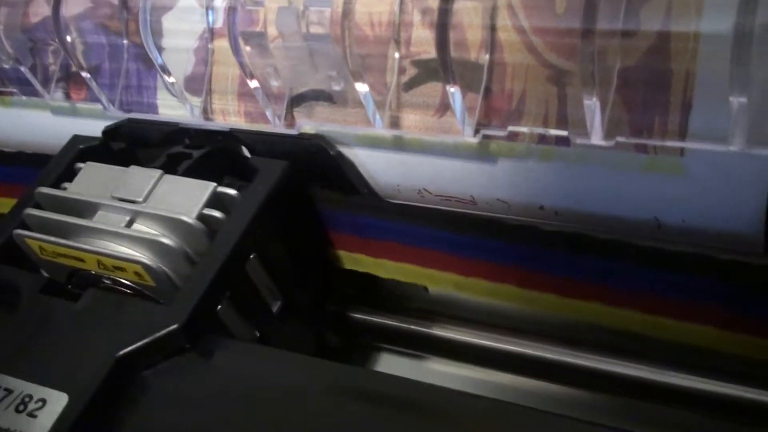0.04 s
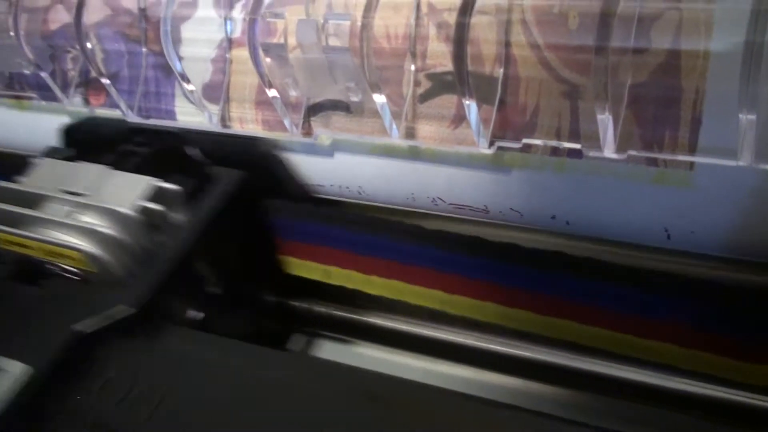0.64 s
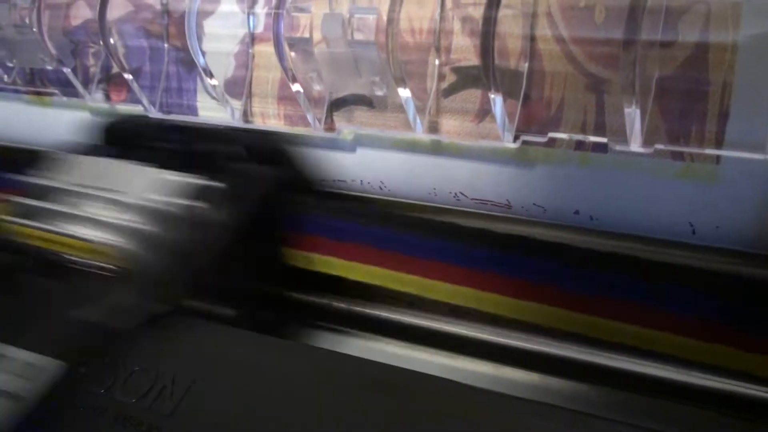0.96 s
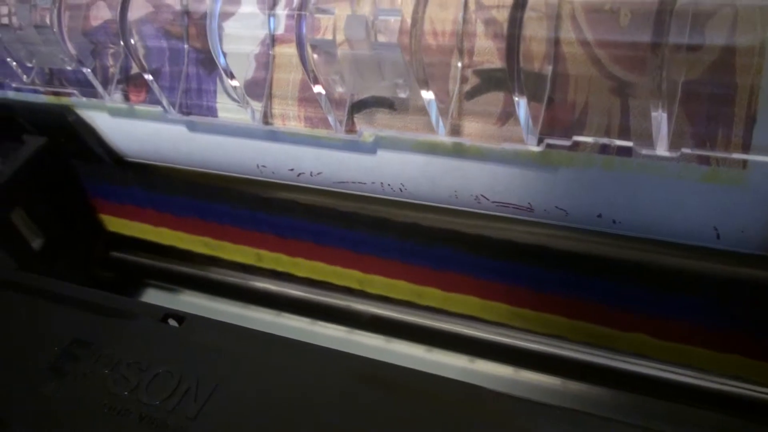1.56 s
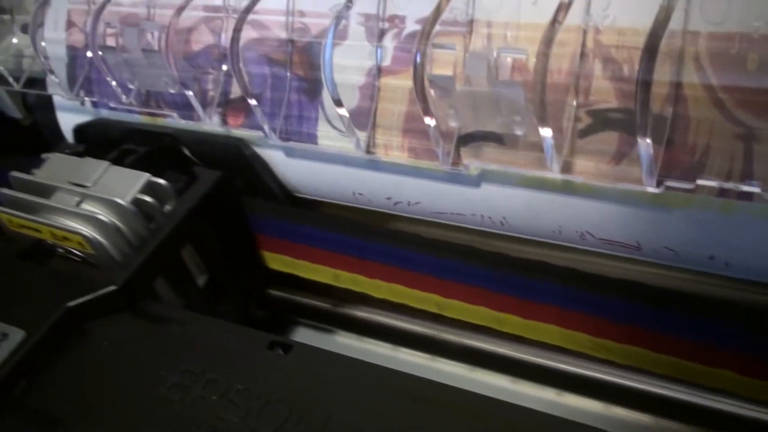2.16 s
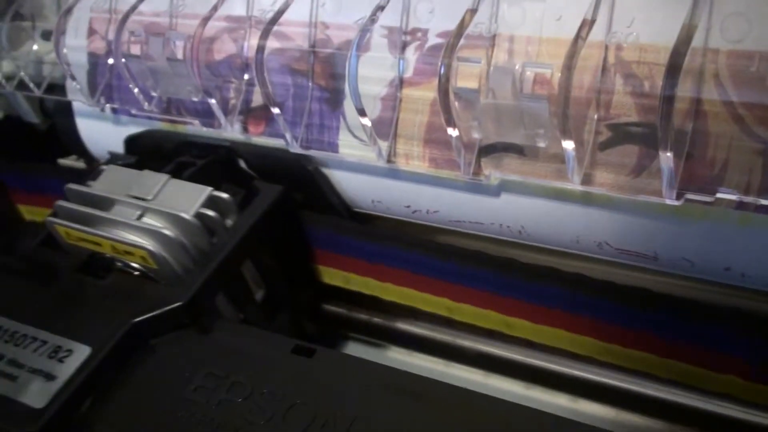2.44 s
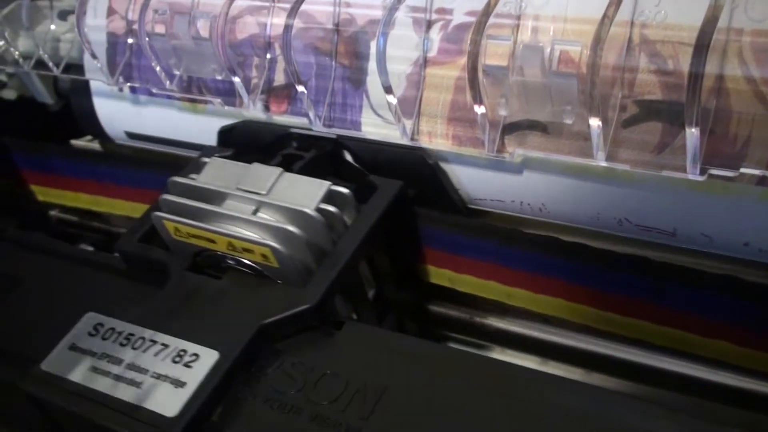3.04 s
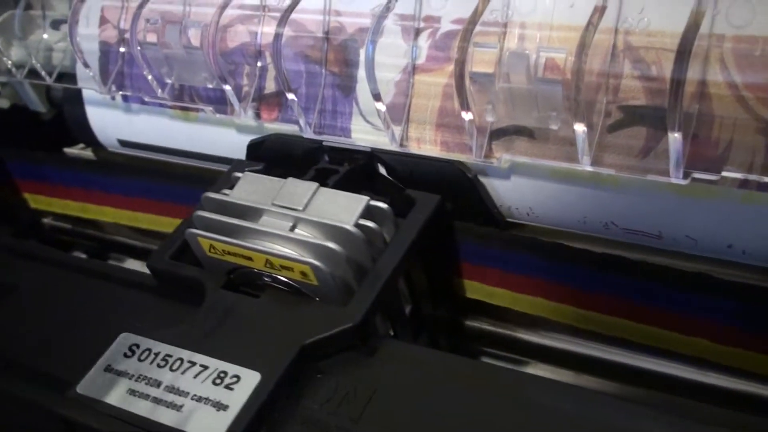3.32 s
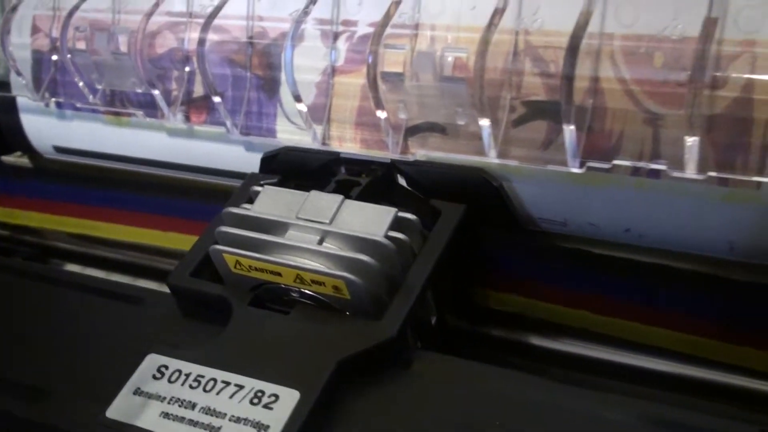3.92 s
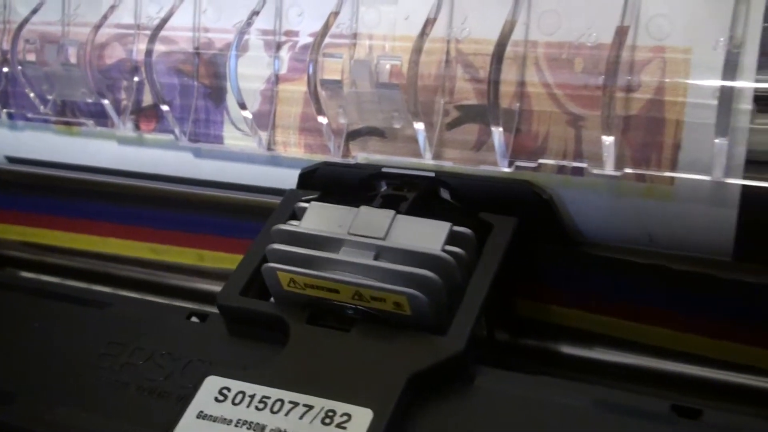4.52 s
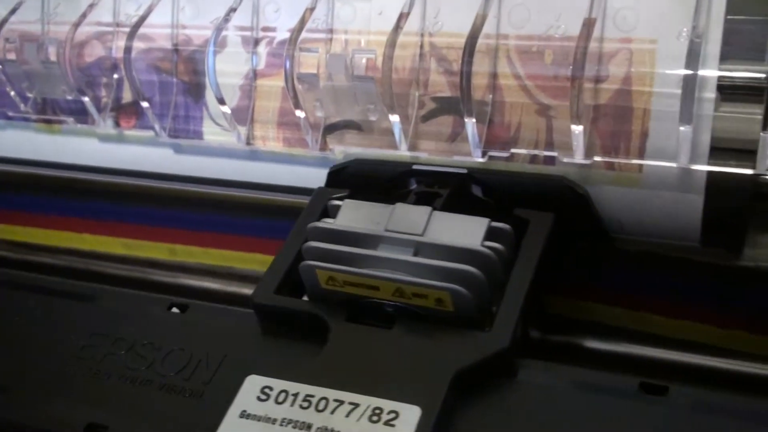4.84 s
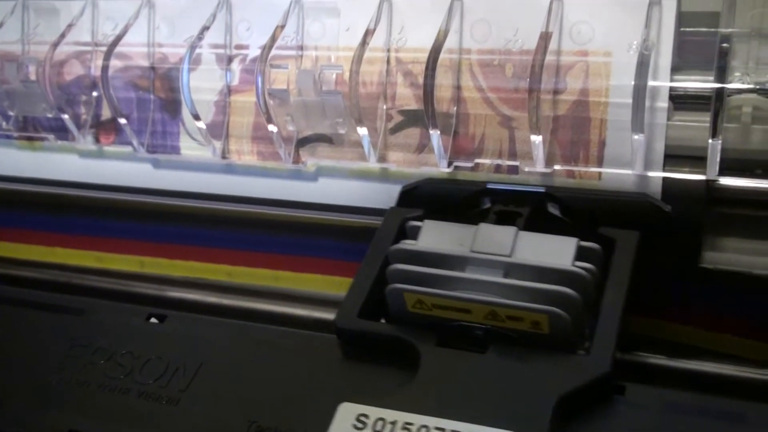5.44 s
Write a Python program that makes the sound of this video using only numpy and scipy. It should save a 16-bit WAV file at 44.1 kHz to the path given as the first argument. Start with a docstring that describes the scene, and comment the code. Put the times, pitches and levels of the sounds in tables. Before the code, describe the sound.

A dot matrix printer works in a quiet room, heard in stereo from just above the carriage. A small steel latch gives a double click at the very start and another at 0.3 seconds. Through the first second and a half, a motor jerks the carriage to and fro in short whirring, whining runs, with irregular gear knocks, plastic clunks, small ticks and a couple of faint scrapes. The strongest knocks fall near 0.6, 0.8 and 1.0 seconds. At about 1.2 seconds the pins fire in one very short, bright rasp. From about 1.6 seconds the head prints continuously: a loud, harsh, rasping buzz of steady pitch with a piercing high whistle on top and a faint motor hum beneath. The whistle swells and dips and the buzz changes colour as the head travels, still going at the end, around 5.5 seconds.

```python
"""A dot matrix printer on a desk in a quiet room, stereo microphone just above the carriage.
First the ribbon shifter's latch clicks and a stepper motor jerks the carriage to and fro: gears knock,
the plastic frame clunks, the ribbon guide scrapes. At 1.2 s the pins fire briefly during a fast run.
From 1.56 s to the end they hammer one slow line, a rasping buzz with a piercing whistle on top,
which changes colour as the head travels through the hollow case."""
import sys
import numpy as np
from scipy import signal
from scipy.fft import rfft, irfft
from scipy.io import wavfile

SR = 44100
rng = np.random.default_rng(int(sys.argv[2]) if len(sys.argv) > 2 else 0)


def transcribe(signal):
    """Save signal, clipped to [-1, 1], as a 16-bit WAV file at the path in sys.argv[1]."""
    frames = np.atleast_2d(signal).T
    limited = np.clip(frames, -1, 1)
    pcm = np.round(limited * 32767).astype(np.int16)
    wavfile.write(sys.argv[1], SR, pcm)


N = 246078
TIME = np.arange(N) / SR


def amp(db):
    """Decibels to gain."""
    return 10 ** (np.asarray(db) / 20)


def unit(x):
    """Scale to rms 1."""
    return x / np.sqrt(np.mean(x ** 2) + 1e-20)


def white():
    """Fresh white noise."""
    return rng.standard_normal(N)


def drift(rate_hz):
    """Smooth random wander, mostly slower than rate_hz; rms about 1."""
    hop, settle = 100, 1000
    pole = np.exp(-2 * np.pi * rate_hz * hop / SR)
    noise = rng.standard_normal(N // hop + settle + 2)
    slow = signal.lfilter([1], [1, -2 * pole, pole * pole], noise)[settle:]
    return np.interp(np.arange(N) / hop, np.arange(len(slow)), unit(slow))


def switch(start, rise=0.0011):
    """Ramp from 0 to 1 at the start time."""
    return np.clip((TIME - start) / rise, 0, 1)


def bell(x, centre, spread):
    """A smooth hump of height 1."""
    return np.exp(-.5 * ((x - centre) / spread) ** 2)


def follow(curve):
    """Gain that follows a curve of (t/s, level/dB)."""
    return amp(np.interp(TIME, *np.transpose(curve)))


def response(points, size=4096):
    """Minimum-phase impulse response of a spectrum of (f/Hz, level/dB)."""
    hz, db = np.transpose(points)
    grid = np.maximum(np.fft.rfftfreq(size, 1 / SR), 1)
    gain = amp(np.interp(np.log(grid), np.log(hz), db))
    cepstrum = irfft(np.log(gain))
    cepstrum[1:size // 2] *= 2
    cepstrum[size // 2 + 1:] = 0
    return irfft(np.exp(rfft(cepstrum)))


def through(x, impulse):
    """Filter that keeps the power of white noise, so only the shape of its spectrum counts."""
    return signal.oaconvolve(x, impulse / np.linalg.norm(impulse))[:N]


def colour(x, points):
    """Give a force a broad spectrum."""
    return through(x, response(points))


def ring(x, modes, size=8192):
    """A force rings a set of damped resonances."""
    t = TIME[:size]
    impulse = sum((-1) ** k * amp(db) * width * np.exp(-np.pi * width * t) * np.cos(2 * np.pi * hz * t)
                  for k, (hz, width, db) in enumerate(modes))
    return through(x, impulse)


def grains(per_s, spread_db):
    """Random small contacts of uneven strength; rms 1."""
    contacts = (rng.random(N) < per_s / SR) * rng.choice([-1, 1], N)
    return unit(contacts * amp(spread_db * np.clip(white(), -2, 2)))


def blow(start, decay_s, rise=0.0016, hold=0):
    """Envelope of a contact: it rises, holds and dies away."""
    return switch(start, rise) * np.exp(-np.maximum(TIME - start - rise - hold, 0) / decay_s)


def hammering(rate_hz, sharpness):
    """Noise that flares at each pin strike."""
    return unit(white() * np.exp(-sharpness * (TIME * rate_hz % 1)))


def with_octave(phase, octave_db):
    """A sine and its second harmonic."""
    return np.sin(phase) + amp(octave_db) * np.sin(2 * phase)


# Room tone, far behind the printer: f/Hz, level/dB
ROOM_SPECTRUM = [(20, -25), (60, -29), (78, -0.5), (91, 17.5), (115, -2), (250, -5), (1000, 1.5),
                 (16000, -35)]
def room_tone(level_db=-57.5):
    """Faint steady noise with a low hum near 90 Hz."""
    return amp(level_db) * colour(white(), ROOM_SPECTRUM)


# Stereo side signal at the microphone: f/Hz, level/dB
SIDE_SPECTRUM = [(100, -18.5), (1000, -8.5), (5000, -16), (8000, -13.5), (15000, -4.5)]
def reflections(x, echo_db=-8.5, t60=0.11, size=16384):
    """Direct sound plus quick reflections from case and desk, partly different left and right."""
    t = TIME[:size]
    shared, apart = rng.standard_normal((2, size)) * amp(-60 * t / t60) * (t > .002)
    side = signal.oaconvolve(through(x, apart), response(SIDE_SPECTRUM))[:N]
    mid = x + amp(echo_db) * through(x, shared)
    return np.array([mid + side, mid - side])


# Ticks inside the case: t/s, level/dB
TICKS = [(0.286, -25.5), (0.818, -28), (1.1311, -9), (1.186, -28), (1.413, -27)]
# Their bright spectrum: f/Hz, level/dB
TICK_SPECTRUM = [(1000, -11), (4000, 1), (7500, 0), (10500, -4.5), (16000, -29)]
def ticks(decay_s=0.0023):
    """Small hard parts tick as the carriage jolts."""
    envelope = sum(amp(db) * blow(start, decay_s, rise=.0005) for start, db in TICKS)
    return colour(white() * envelope, TICK_SPECTRUM)


# Scrapes at the ribbon guide: start t/s, end t/s, level/dB
SCRAPES = [(0.456, 0.491, -31), (0.582, 0.596, -28.5)]
# Resonances of the guide: f/Hz, width/Hz, level/dB
GUIDE_MODES = [(2440, 220, 0.5), (3050, 230, 3), (3780, 290, -4), (4130, 200, -6)]
def ribbon_scrapes(slips_per_s=2500):
    """The plastic guide sticks and slips in quick succession while it shifts."""
    rub = sum(amp(db) * (switch(start) - switch(end, rise=0.0051)) for start, end, db in SCRAPES)
    return ring(rub * grains(slips_per_s, spread_db=4.5), GUIDE_MODES)


# Latch clicks at the ribbon shifter: t/s, level/dB
LATCH_CLICKS = [(0.0074, -6), (0.0154, -11), (0.3032, -5), (0.313, -7.5)]
# Resonances of the steel: f/Hz, width/Hz, level/dB
LATCH_MODES = [(2550, 19, 4), (2880, 170, -0.5), (4170, 41, -5), (6200, 110, 0.5), (6880, 150, -5),
               (8650, 330, -9), (9870, 200, -2), (12700, 490, -14)]
# Crack of a hard contact at close range, for latch and knocks: f/Hz, level/dB
CRACK_SPECTRUM = [(500, -15), (1500, 0.5), (2600, 4), (4000, 4), (6300, 3.5), (8500, -3), (11000, -4),
                  (13000, -14), (16000, -33)]
def latch(ring_db=-6.5, crack_db=-10.5, decay_s=0.002):
    """The small steel latch gives two double clicks and rings briefly."""
    force = white() * sum(amp(db) * blow(start, decay_s) for start, db in LATCH_CLICKS)
    return amp(ring_db) * ring(force, LATCH_MODES) + amp(crack_db) * colour(force, CRACK_SPECTRUM)


# Knocks of carriage and gears: t/s, level/dB, dullness/dB (more thud, less crack)
KNOCKS = [(0.16, -8.5, -1.5), (0.255, -16, 8), (0.351, -18.5, -2), (0.406, -16, 1.5), (0.459, -17, 4),
          (0.476, -11.5, 0), (0.586, -18.5, 3), (0.611, -5, 1.5), (0.635, -9.5, -2.5), (0.677, -13.5, 2),
          (0.709, -32, 5), (0.799, -5.5, 1), (0.984, -4, -2.5), (1.124, -14.5, -2), (1.134, -8, 2.5),
          (1.15, -9.5, 13.5), (1.402, -19.5, 6), (1.421, -13.5, -4.5)]
# The plastic frame, rung by knocks and by the running carriage: f/Hz, width/Hz, level/dB
FRAME_MODES = [(672, 117, -2), (905, 110, 0.5), (1198, 75, 6), (1350, 130, 0.5), (1536, 360, -5.5),
               (2063, 110, -5.5), (2350, 210, -13.5)]
# Thud of a knock at close range: f/Hz, level/dB
THUD_SPECTRUM = [(30, -31), (88, 2.5), (160, -22.5), (260, 8.5), (450, 7.5), (700, 1.5), (1000, -13),
                 (2000, -30), (6000, -47)]
def knocks(frame_db=-14.0, thud_db=-22.5, crack_db=-17.5, decay_s=0.007, slack_s=0.004, rebound_s=0.023):
    """Gears take up their slack, hit and rebound in the drive's play: frame ring, thud and crack."""
    frame, thud, crack = np.zeros((3, N))
    for start, db, dull_db in KNOCKS:
        touch = amp(-17.5) * blow(start - slack_s, decay_s)
        hit = blow(start, decay_s, rise=0.0015, hold=0.013 * amp(db))  # harder knocks chatter longer
        rebound = amp(-12.5) * blow(start + rebound_s, decay_s)
        force = amp(db) * (touch + hit + rebound)
        frame += force
        thud += force * amp(dull_db)
        crack += force * amp(-dull_db)
    return (amp(frame_db) * ring(frame * grains(4000, spread_db=2.0), FRAME_MODES)
            + amp(thud_db) * colour(thud * white(), THUD_SPECTRUM)
            + amp(crack_db) * colour(crack * grains(3000, spread_db=5.0), CRACK_SPECTRUM))


# Carriage runs just below the microphone:
# start t/s, stop t/s, run-up t/s, full step rate f/Hz, hum level/dB, slide level/dB, shake level/dB
MOTOR_RUNS = [(-.04, 0.13, 0.036, 466, -41, -40.5, -31.5), (0.133, .24, 0.022, 520, -43, -41, -35),
              (0.241, 0.462, 0.073, 540, -44, -38, -31), (.458, 0.608, .018, 503, -37, -49, -32.5),
              (.605, 0.799, 0.026, 604, -63, -39.5, -34), (0.803, 0.982, 0.022, 610, -62, -38.5, -33.5),
              (0.985, 1.216, 0.044, 903, -40, -34.5, -27.5), (1.189, 1.389, 0.033, 456, -52, -45.5, -36),
              (1.392, 1.492, 0.032, 390, -44, -46, -42), (1.493, 1.557, 0.05, 150, -56, -42, -31)]
# Low resonances of the chassis: f/Hz, width/Hz, level/dB
CHASSIS_MODES = [(145, 33, -7), (260, 28, -4.5), (381.5, 106, 3.5), (437, 140, 1.5), (688, 270, -9)]
# Friction of the sliding carriage: f/Hz, level/dB
SLIDE_SPECTRUM = [(100, 0.5), (300, 10.5), (1200, 1), (2000, 0), (4000, 3), (6200, 0.5), (8500, -0.5),
                  (11000, -1.5), (13000, -11), (16000, -17)]
def carriage(whine_order=4, resonance_hz=2470, resonance_width_hz=240, brake_per_ramp=1.65):
    """A stepper ramps up and brakes; tones follow its step rate, friction follows the speed."""
    tones, slide, rattle, shudder = np.zeros((4, N))
    jitter = 0.22 * drift(90)  # the belt jitters the rotor
    judder = 1.7 * drift(140)  # more so under braking
    for start, stop, ramp, step_hz, hum_db, slide_db, shake_db in MOTOR_RUNS:
        on = (TIME > start) & (TIME < stop)
        rising = (TIME[on] - start) / ramp
        falling = (stop - TIME[on]) / (ramp * brake_per_ramp)
        speed = np.clip(np.minimum(rising, falling), 0, 1)
        phase = 2 * np.pi * np.cumsum(step_hz * (.25 + .75 * speed)) / SR
        hum = amp(hum_db) * speed * with_octave(phase, -8.0)
        # the whine is loudest in runs where it meets a resonance of the frame
        cogging = whine_order * phase + jitter[on]
        resonance = 1 / np.hypot(1, 2 * (whine_order * step_hz - resonance_hz) / resonance_width_hz)
        whine = amp(-41.5) * resonance * speed ** 2 * with_octave(cogging, -14.0)
        # braking loads the motor, so the whine falls as a short rough chirp
        load = 2 * speed * np.sqrt(1 - speed) * (falling < rising)
        chirp = amp(-39.5) * load * with_octave(cogging + judder[on], -8.0)
        # in medium-fast runs the rotor's two-step wobble meets a chassis resonance
        wobble = amp(-44.0) * speed ** 2 * np.sin(phase / 2) * (550 < step_hz < 700)
        tones[on] += np.sqrt(2) * (hum + whine + chirp + wobble)
        slide[on] += amp(slide_db) * speed ** 2
        rattle[on] += amp(shake_db - 10.5) * np.sqrt(speed)
        shudder[on] += amp(shake_db) * bell(speed, 0.42, spread=0.27)  # slow steps shake the chassis
    friction = slide * colour(grains(9000, spread_db=3.5), SLIDE_SPECTRUM)
    motor = tones * amp(2.0 * drift(60))
    frame = rattle * ring(grains(900, spread_db=15.5), FRAME_MODES)
    chassis = ring(shudder * grains(700, spread_db=1.0), CHASSIS_MODES)
    return motor + friction + frame + chassis


STRIKE_HZ, LINE_START_S = 601.0, 1.5575  # strike rate and start of the printed line
# Motor tones beneath the printing: multiple of the step rate, level/dB
CRAWL_TONES = [(1, -68), (2, -59.5), (4, -54), (5, -62.5), (7, -70)]
def motor_crawl(strikes_per_step=3):
    """The stepper hums faintly, wavering in level, as it inches the head along the line."""
    phase = 2 * np.pi * STRIKE_HZ / strikes_per_step * TIME
    return np.sqrt(2) * sum(amp(db + 0.73 * drift(2.9)) * np.sin(k * phase) for k, db in CRAWL_TONES)


# Rasp of the pins on the fast run: f/Hz, level/dB
BURST_SPECTRUM = [(200, -29), (900, -35), (1350, -3), (2000, -14), (2750, -12), (3500, -12.5), (4700, -3),
                  (6200, 6.5), (7500, 2), (9000, 1.5), (11000, -4), (16000, -14)]
def pin_burst(start_s=1.2195, end_s=1.2785, rate_hz=1350, rasp_db=-19.0, tone_db=-33.0):
    """The pins fire briefly while the carriage runs fast; the second partial rings out."""
    gate = switch(start_s) - switch(end_s)
    phase = 2 * np.pi * rate_hz * TIME + 0.27 * drift(60)
    tone = np.sin(2 * phase) + amp(-5.5) * (np.sin(phase) + np.sin(3 * phase))
    rasp = colour(hammering(rate_hz, sharpness=2.1), BURST_SPECTRUM)
    return gate * (amp(rasp_db) * rasp + amp(tone_db) * tone)


# Partials held back at the left end of the case: multiple, half clear at t/s, shaded level/dB
SHADED_PARTIALS = [(1, 2.6, -7.5), (2, 2.2, -6), (4, 2.97, -6), (5, 2.37, -11.5), (6, 2.83, -10.5),
                   (7, 2.7, -3)]
# Crests (+) and nodes (-) of standing waves along the head's path: t/s, multiple, level/dB
STANDING_WAVES = [(1.9, 3, 5), (1.9, 12, 11), (2.36, 10, 8), (2.58, 5, 5), (2.63, 7, -9), (2.96, 1, 10.5),
                  (2.96, 6, 6), (2.96, 7, 7.5), (2.96, 12, 2.5), (3.25, 10, -22), (3.55, 4, 5),
                  (3.75, 3, 7), (4.42, 4, 7), (4.6, 14, 7.5), (4.66, 2, -11), (4.92, 4, 9.5),
                  (4.92, 6, 9.5), (4.94, 5, 3), (5.14, 5, -6.5), (5.25, 4, -8)]
def case_gain(k):
    """How the case passes partial k as the head travels; shorter waves clear and pass faster."""
    shade_db = sum(db * (1 - np.tanh((TIME - clear_s) * k / 0.24)) / 2
                   for multiple, clear_s, db in SHADED_PARTIALS if round(multiple) == k)
    passing_s = 0.34 / k ** 0.59
    waves_db = sum(db * bell(TIME, centre_s, passing_s)
                   for centre_s, multiple, db in STANDING_WAVES if round(multiple) == k)
    return amp(shade_db + waves_db)


# Strength of the pin impacts along the line: t/s, level/dB
IMPACT_LEVELS = [(1.6, -24.5), (2.2, -24.5), (2.41, -22), (2.52, -23), (3.01, -25), (3.12, -23),
                 (5.47, -24), (5.55, -25)]
# The impacts, heard from just above the paper: f/Hz, level/dB
IMPACT_SPECTRUM = [(100, -51), (500, -21.5), (1000, -23), (1500, -16), (1980, -21), (2500, -20),
                   (3400, -16), (4500, -14), (4900, -2.5), (7000, -2.5), (7800, 1.5), (9500, -3),
                   (11000, -6), (12500, -8.5), (15700, -13)]
# Resonances of the hollow case: f/Hz, width/Hz, level/dB
CASE_MODES = [(1473, 150, -3.6), (2435, 470, -1.6), (2990, 344, 1), (4100, 610, -1.1)]
def pin_rasp(direct_db=-0.5, hollow_db=-15.0):
    """Uneven impacts on ribbon and paper rasp and ring the case, which swells with the sixth partial."""
    impacts = hammering(STRIKE_HZ, sharpness=2.25) * amp(drift(70))
    direct = amp(direct_db) * colour(impacts, IMPACT_SPECTRUM)
    hollow = amp(hollow_db) * ring(hammering(STRIKE_HZ, sharpness=5.9), CASE_MODES)
    return follow(IMPACT_LEVELS) * (direct + case_gain(6) ** 0.44 * hollow)


def strike_partial(k, wander_db, flutter_db=1.75, side_db=0.5, side_phase=0.21):
    """Stereo partial k, rms 1; as the head moves, reflections give rounded swells and deeper fades."""
    phase = 2 * np.pi * k * STRIKE_HZ * TIME + 1.52 * rng.normal() + 0.15 * drift(17)
    swell = drift(2.63)
    rounded_swell = np.minimum(swell, 1.38 * np.tanh(swell))
    level = amp(wander_db * rounded_swell + flutter_db * drift(14.0))
    aside = k / 10 * drift(1.9) * np.array([[1], [-1]])  # opposite in left and right
    return unit(level * amp(side_db * aside) * np.sin(phase + side_phase * aside))


# The whistle along the line: t/s, level/dB
WHISTLE_LEVELS = [(1.6, -20), (2.17, -24.5), (2.28, -30), (2.58, -20.5), (2.77, -25.5), (3.48, -20),
                  (4.31, -24.5), (4.54, -23.5), (4.92, -31.5), (5.12, -24), (5.19, -26.5), (5.55, -23)]
def head_whistle(start_s=1.578, multiple=13, gain_db=2.5):
    """Once all pins are at work, the head rings on one piercing partial of the strikes."""
    tone = strike_partial(multiple, wander_db=0, flutter_db=0.7, side_db=0.4, side_phase=0.065)
    return amp(gain_db) * follow(WHISTLE_LEVELS) * switch(start_s) * tone


# Buzz of the print head, right under the microphone: multiple of the strike rate, level/dB
PIN_PARTIALS = [(1, -24.5), (2, -12.5), (3, -19), (4, -16.5), (5, -14.5), (6, -17), (7, -14.5), (8, -16.5),
                (9, -14.5), (10, -11.5), (11, -13), (12, -10), (14, -7.5), (15, -10), (16, -20), (17, -12),
                (18, -14.5), (19, -18), (20, -37), (21, -24.5), (22, -21), (23, -43), (25, -17.5),
                (26, -16)]
def pin_buzz(gain_db=-22.0):
    """Regular pin strikes make a harmonic buzz, each partial shaped by the case."""
    buzz = np.zeros((2, N))
    for multiple, db in PIN_PARTIALS:
        k = round(multiple)
        wander_db = np.interp(k, [1, 10], [1.1, 4.5])  # short waves swell and fade more
        buzz += amp(gain_db + db) * case_gain(k) * strike_partial(k, wander_db)
    return buzz


def scene():
    """At the microphone: the shuttling mechanism, then the printed line, over the room tone."""
    printing = switch(LINE_START_S)
    tones = printing * (pin_buzz() + head_whistle() + motor_crawl())
    rasp = printing * pin_rasp()
    mechanism = carriage() + knocks() + latch() + ticks() + ribbon_scrapes()
    return tones + reflections(mechanism + pin_burst() + rasp + room_tone())


def record(dry, ceiling=0.68, cutoff_hz=15750):
    """Peaks are rounded and the highest treble is cut."""
    lowpass = signal.ellip(12, .1, 90, cutoff_hz, fs=SR, output="sos")
    return signal.sosfilt(lowpass, ceiling * np.tanh(dry / ceiling))


dry = scene()
out = record(dry)
transcribe(out)
```